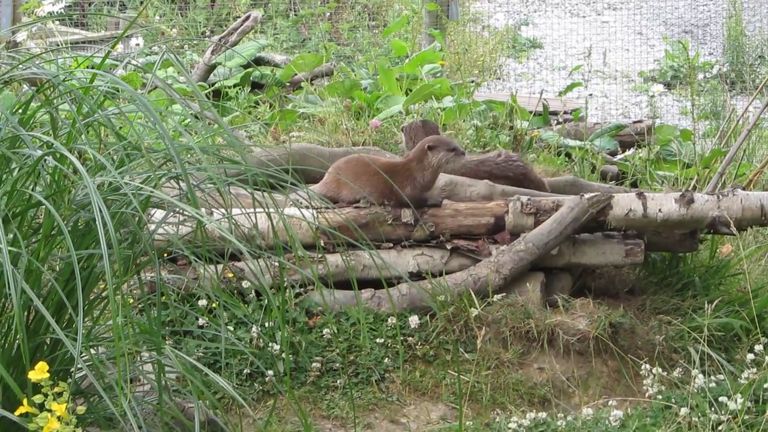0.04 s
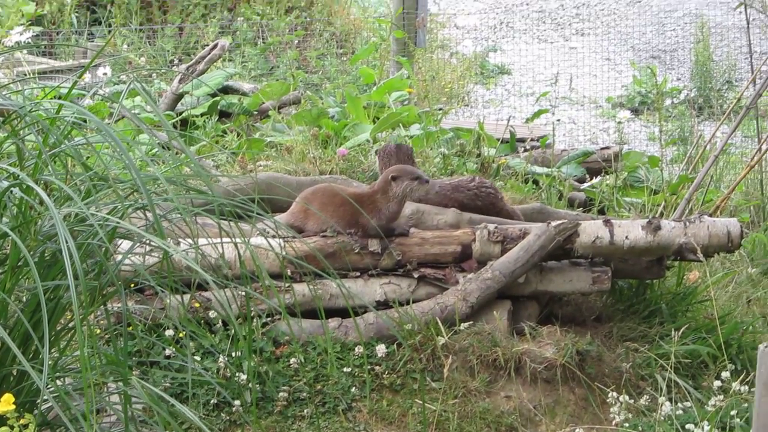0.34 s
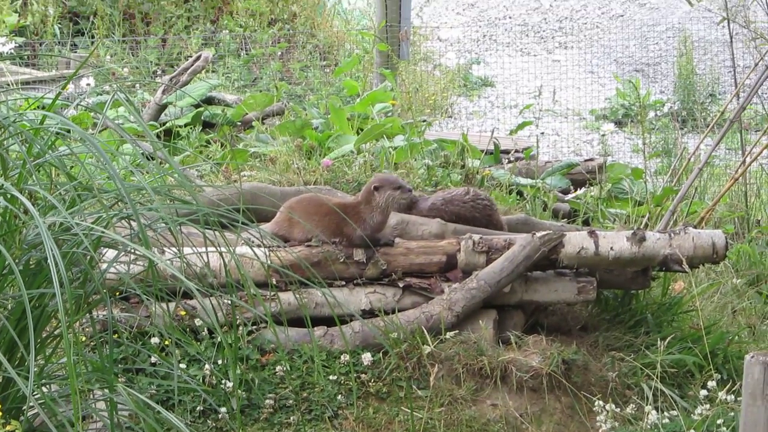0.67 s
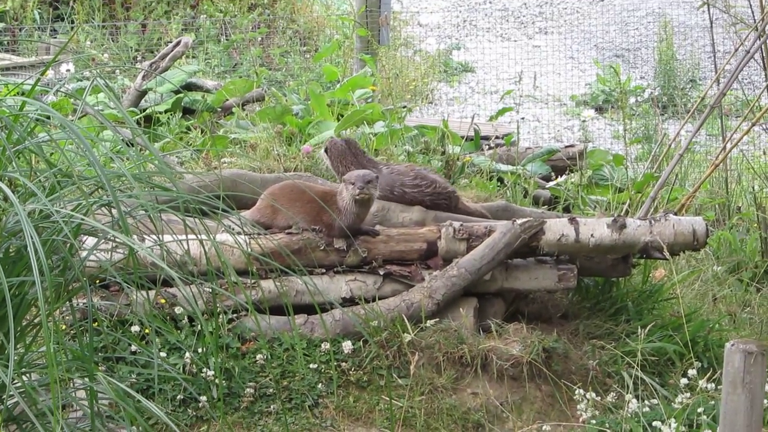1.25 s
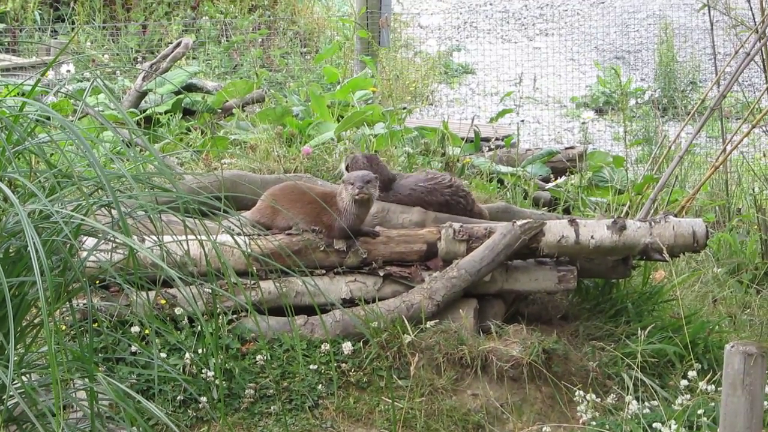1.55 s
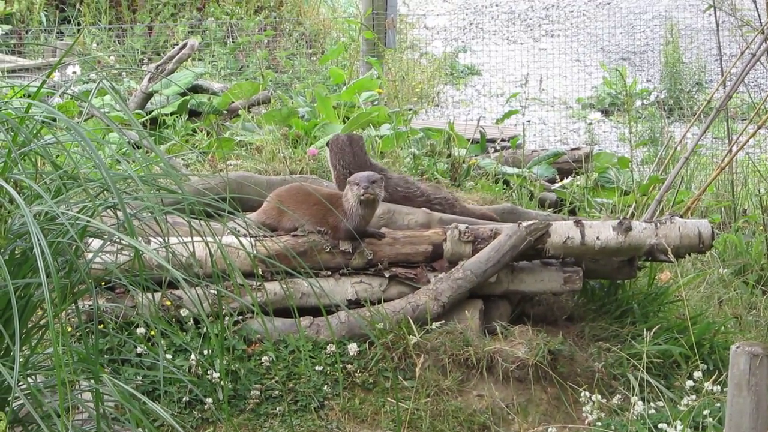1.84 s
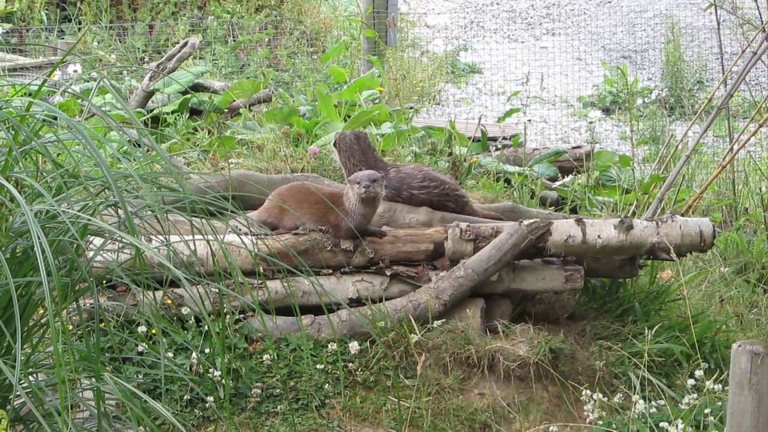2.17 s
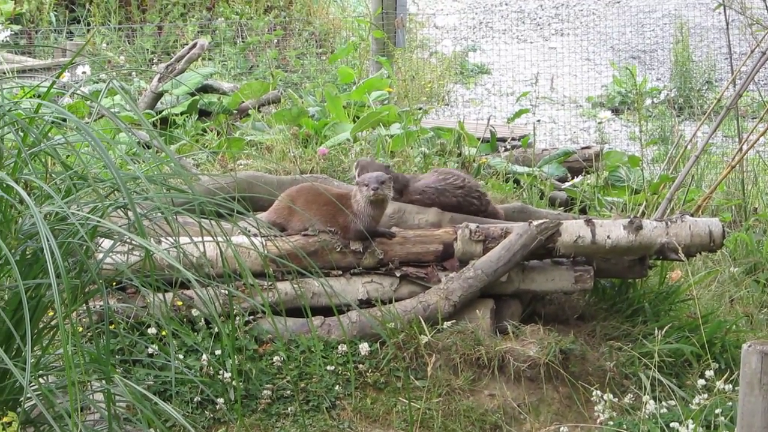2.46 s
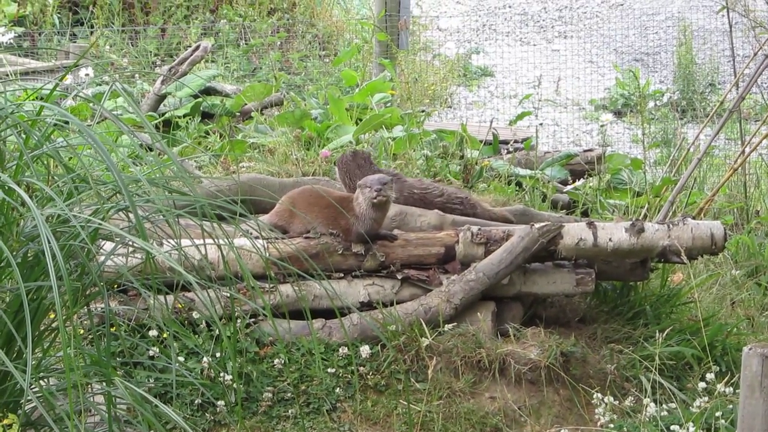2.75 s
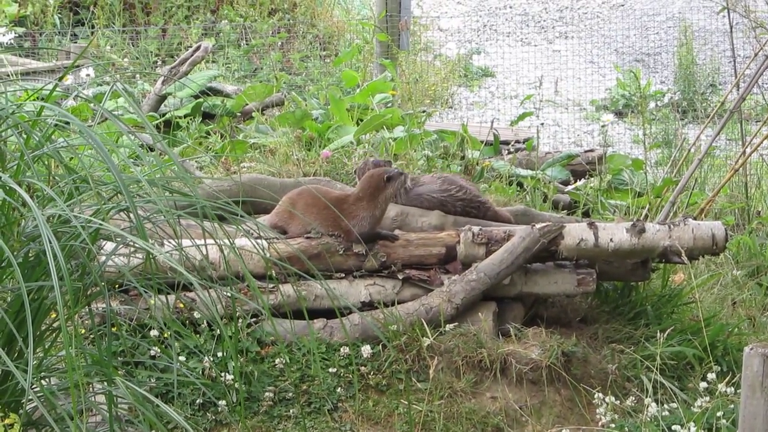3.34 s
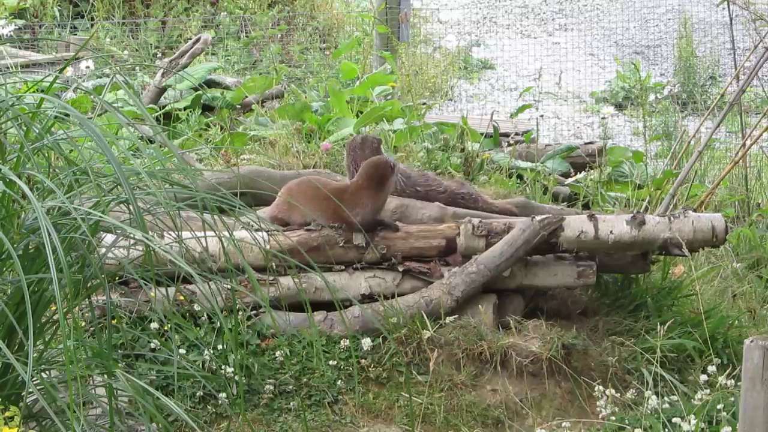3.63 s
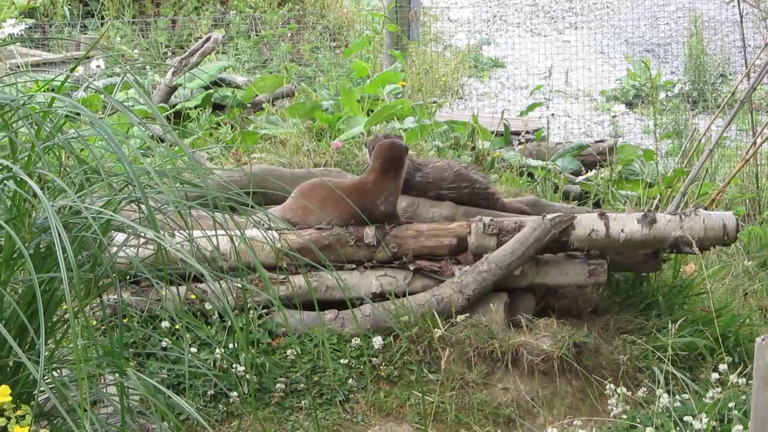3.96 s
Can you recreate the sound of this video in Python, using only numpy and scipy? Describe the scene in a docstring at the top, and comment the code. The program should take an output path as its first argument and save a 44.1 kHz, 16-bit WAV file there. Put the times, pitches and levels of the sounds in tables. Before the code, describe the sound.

An otter whines softly, then gives a sharp falling squeal that breaks into a long, level whine. Two more high squeals follow, the last one weaker. Water trickles steadily underneath in an outdoor enclosure with a slight echo.

```python
"""Water trickles and splashes under a brief, soft whine from an otter on an outdoor log pile.
The otter gives three sharp falling squeals; the first breaks into a long, level whine that opens
and closes with the mouth. The water is a noise wash with droplets and ringing bubbles.
The enclosure adds a short echo to the voice, and a gain control ducks the water after loud squeals."""
import sys
import numpy as np
from scipy import signal
from scipy.fft import rfft, irfft
from scipy.io import wavfile
from scipy.ndimage import uniform_filter1d, minimum_filter1d

SR = 44100
rng = np.random.default_rng(int(sys.argv[2]) if len(sys.argv) > 2 else 0)


def unload_audio(sound):
    """Save the sound as a 16-bit wav file, at the path given as the first command line argument."""
    columns = np.transpose(np.atleast_2d(sound))
    # keep every value between -1 and 1, then stretch to whole-number steps
    steps = np.round(np.clip(columns, -1, 1) * 32767)
    wavfile.write(sys.argv[1], SR, steps.astype(np.int16))


N = 176400
TIME = np.arange(N) / SR


def amp(db):
    """Decibels to gain."""
    return 10 ** (np.asarray(db) / 20)


def unit(x):
    """Scales to rms 1."""
    return x / np.sqrt(np.mean(x ** 2) + 1e-20)


def read(points, hz):
    """Reads a table on a log-frequency axis."""
    f, value = np.transpose(points)
    return np.interp(np.log(hz + 1), np.log(f + 1), value)


def add(mix, start_s, sound):
    """Mixes a sound in place."""
    part = mix[max(round(start_s * SR), 0):][:len(sound)]
    part += sound[:len(part)]


def colour(x, spectrum):
    """Filters by a table of Hz and dB."""
    return irfft(rfft(x) * amp(read(spectrum, np.fft.rfftfreq(len(x), 1 / SR))), len(x))


def wander(t, rate_hz):
    """Smooth random motion, rms about 1, at the times t."""
    hz = np.fft.rfftfreq(N, 1 / SR)
    motion = irfft(rfft(rng.standard_normal(N)) / (1 + (hz / rate_hz) ** 2), N)
    return np.interp(t, TIME, unit(motion))


# Each row: frequency in Hz, relative spectral density in dB.
WASH_SPECTRUM = [(15, -35), (25, -5), (110, -7.5), (220, -8), (359, -4.5), (470, -6.5), (649, -2),
                 (805, -6.5), (1140, -0.5), (1460, -5.5), (1670, -1.5), (2430, -1.5), (3010, -0.5),
                 (4390, -4.5), (5740, -5), (11300, -11.5), (13600, -15), (15600, -25)]

def wash(level_db=-34.5, patch_db=1.5, flicker_db=1.18):
    """Running water: noise in shifting patches, flickering as it lands."""
    frames, bins = N // 256 + 5, 513
    real, imag, patches = rng.standard_normal((3, frames, bins))
    patches = uniform_filter1d(patches, size=4, axis=0)
    patches = unit(uniform_filter1d(patches, size=14, axis=1))
    spectra = (real + 1j * imag) * amp(patch_db * patches)
    noise = signal.istft(spectra.T, nperseg=1024, noverlap=768)[1][:N]
    flicker = amp(flicker_db * wander(TIME, rate_hz=54))
    return amp(level_db) * unit(colour(noise, WASH_SPECTRUM) * flicker)


def impacts(per_s, spread_db=4):
    """Random impulses, a few much larger than the rest."""
    hits = (rng.random(N) < per_s / SR) * rng.choice([-1, 1], N)
    return hits * amp(spread_db * np.minimum(rng.exponential(1, N), 4))


# Each row: frequency in Hz, relative spectral density in dB.
SPRAY_SPECTRUM = [(200, -23), (1000, -4.5), (3000, 1.5), (4500, -4.5), (7000, -1), (10000, -41),
                  (15000, -23)]

def spray(level_db=-41.5):
    """Droplets land in a dense patter."""
    return amp(level_db) * unit(colour(impacts(per_s=900), SPRAY_SPECTRUM))


def bubble(hz, decay_s, chirp_per_s=0.71):
    """A bubble rings briefly, rising in pitch."""
    t = TIME[:int(10 * decay_s * SR)]
    envelope = t / decay_s * np.exp(1 - t / decay_s)
    return envelope * np.sin(2 * np.pi * hz * t * (1 + chirp_per_s * t))


def fizz(level_db=-51.5, per_s=200, sizes=20, decay_cycles=1.9):
    """Small bubbles of many sizes ring at random."""
    rings = sum(signal.oaconvolve(impacts(per_s / sizes), bubble(hz, decay_cycles / hz))[:N]
                for hz in np.geomspace(489, 4090, sizes))
    return amp(level_db) * unit(rings)


def splash(decay_s, centre_hz, width_octaves=1.45, samples=8192):
    """A burst of spray or a low slosh: band noise that swells fast and dies away."""
    octaves = np.log2((np.fft.rfftfreq(samples, 1 / SR) + 1) / centre_hz)
    band = 1 / (1 + (octaves / width_octaves) ** 2) ** 2
    noise = unit(irfft(rfft(rng.standard_normal(samples)) * band))
    age = TIME[:samples] / decay_s
    return 2 * noise * np.exp(-age) * (1 - np.exp(-4 * age))


# Each row: time in seconds, gain of the trickle in dB.
FLOW = [(0, 0.57), (1.3, -0.5), (1.9, 1.5), (3.1, -0.9), (4, 0)]
# Each row: start in seconds, level in dB, decay in seconds, centre in Hz.
SPLASHES = [(.43, -32, 0.0057, 1240), (0.484, -28.5, 0.0051, 2980), (0.589, -33, 0.0063, 3800),
            (0.624, -37, 0.019, 288), (.636, -33.5, 0.016, 1400), (2.208, -30, 0.011, 2500),
            (2.485, -29, 0.0059, 3500), (2.578, -30, 0.0079, 2780), (3.268, -31, 0.0034, 2994),
            (3.445, -29, 0.0032, 2740), (3.484, -31, 0.0064, 2720), (3.853, -31, 0.0057, 3000),
            (3.914, -31, .008, 3194), (3.948, -30.5, 0.006, 3000)]
# Each row: start in seconds, pitch in Hz, level in dB, decay in seconds.
DRIPS = [(0.612, 2980, -27, 0.00033), (1.56, 526, -36.5, 0.0017), (1.74, 350, -35.5, 0.0031),
         (2.781, 610, -33, 0.0017), (3.105, 3040, -15, 0.00023), (3.545, 645, -39, 0.006),
         (3.799, 512, -39, 0.0039)]

def water():
    """A steady trickle with larger splashes and drips, from deep plops to short ticks."""
    mix = (fizz() + wash() + spray()) * amp(np.interp(TIME, *np.transpose(FLOW)))
    for start_s, db, decay_s, centre_hz in SPLASHES:
        add(mix, start_s, amp(db) * splash(decay_s, centre_hz))
    for start_s, hz, db, decay_s in DRIPS:
        add(mix, start_s, amp(db) * np.sqrt(2) * bubble(hz, decay_s))
    return mix


# Each row: frequency in Hz, time to fall 60 dB in seconds.
ECHO_T60 = [(1000, .16), (4000, .12), (14000, .09)]
# Each row: delay in seconds, relative gain.
REFLECTIONS = [(.006, 0.047), (0.015, 0.27), (0.023, 0.22), (.034, 0.42)]

def enclosure(x, build_s=0.0078):
    """A few reflections off logs and walls, and a short scattered tail."""
    hz, t, spectra = signal.stft(rng.standard_normal(SR // 2), SR, nperseg=256)
    decay = amp(-60 * t / read(ECHO_T60, hz)[:, None])
    response = signal.istft(spectra * decay, SR, nperseg=256)[1]
    response *= np.minimum(TIME[:len(response)] / build_s, 1)
    response /= np.linalg.norm(response)
    for delay_s, gain in REFLECTIONS:
        add(response, delay_s, np.array([gain]))
    return signal.fftconvolve(x, response / np.linalg.norm(response))[:N]


def controls(curve, fade_s=0.001):
    """Sample times, an edge fade, and the smoothed columns of a call's curve."""
    times_s, *columns = np.transpose(curve)
    t = np.arange(round(times_s[0] * SR), round(times_s[-1] * SR)) / SR
    fade = np.clip(np.minimum(t - t[0], t[-1] - t) / fade_s, 0, 1)
    return t, fade, *[uniform_filter1d(np.interp(t, times_s, column), size=130) for column in columns]


def harmonics(hz, levels_db):
    """Sums the harmonics of a pitch curve, each at its own rms level."""
    phase = 2 * np.pi * np.cumsum(hz) / SR
    return np.sqrt(2) * sum(amp(db) * (k * hz < SR / 2) * np.sin(k * phase)
                            for k, db in enumerate(levels_db, 1))


# Mouth nearly shut, open and gaping. Each row: frequency in Hz, gain in dB.
THROAT_SHUT = [(930, -17.5), (1860, -14), (2800, -1), (3700, -21.5), (4650, -20), (5580, -2.5), (6500, -29),
               (15000, -67)]
THROAT_OPEN = [(940, -20.5), (1950, -17.5), (2800, 0.5), (3000, -2), (3740, -1), (4000, -5), (4600, -9.5),
               (5150, -6), (5900, -3.5), (6500, -12.5), (6950, -5.5), (7450, -23.5), (7900, -15.5),
               (8400, -15.5), (9000, -37), (10000, -23), (15000, -49)]
THROAT_GAPING = [(1050, -21), (1400, -29), (2100, -8.5), (2900, -9.5), (3750, -4.5), (4200, -6),
                 (5100, 1.5), (5800, -15), (7800, -12), (9500, -23.5), (15000, -40)]

def throat_db(hz, mouth):
    """Throat resonances, whose valleys fill in as the mouth opens."""
    shut, gaping = np.clip(1 - mouth, 0, 1), np.clip(mouth - 1, 0, 1)
    return (shut * read(THROAT_SHUT, hz) + (1 - shut - gaping) * read(THROAT_OPEN, hz)
            + gaping * read(THROAT_GAPING, hz))


# Each row: time in seconds, pitch in Hz, level in dB, mouth (0 nearly shut, 1 open, 2 gaping).
SHORT_WHINE = [(0, 914, -25, 0.84), (.035, 890, -36, 1), (.085, 814, -42, .5)]
WHINE = [(0.895, 1479, -13, 1.4), (0.92, 1288, -20, 2.1), (0.973, 1054, -26, 1.7), (1.009, 950, -39, 0.58),
         (1.045, 941, -40.5, 0.88), (1.134, 992, -23.5, 0.84), (1.22, 987.3, -24, 0.9),
         (1.326, 971.5, -29.5, 1.1), (1.365, 953, -26, 0.68), (1.47, 920, -31.5, 0.41),
         (1.515, 933, -29, 0.37), (1.658, 922.2, -28.5, 0.35), (1.786, 925, -26.5, 0.49),
         (1.83, 914, -29.5, 0.4), (1.868, 927.5, -25, 0.3), (1.886, 933.5, -27, 0.81),
         (2.045, 936, -25.5, 0.94), (2.07, 928, -27, 0.51), (2.114, 918, -29, 0.48), (2.13, 900, -33, 0.4)]
# Each row: curve, treble cut in dB per kHz.
WHINES = [(SHORT_WHINE, 7.7), (WHINE, 0)]
# The voice cracks, then catches. Each row: centre in seconds, width in seconds, jitter as a pitch share.
CRACKS = [(0.897, 0.0105, 0.07), (1.482, 0.011, 0.015)]

def whines(echo_db=-10, dull_from_hz=2850, shimmer_db=0.33, base_jitter=0.0026):
    """Nasal tones shaped by the throat; overtones in its valleys flutter most."""
    for curve, cut_db_per_khz in WHINES:
        t, fade, hz, db, mouth = controls(curve)
        db = db + shimmer_db * wander(t, rate_hz=45)
        levels_db = []
        for k in range(1, 15):
            gain_db = throat_db(k * hz, mouth)
            cut_db = cut_db_per_khz * np.maximum(k * hz - dull_from_hz, 0) / 1000
            flutter_db = 0.43 + 0.076 * np.clip(-gain_db, 0, 20)
            levels_db.append(db + gain_db - cut_db + flutter_db * wander(t, rate_hz=11))
        cracks = sum(share * np.exp(-abs(t - centre_s) / width_s) for centre_s, width_s, share in CRACKS)
        pitch_hz = hz * (1 + (base_jitter + cracks) * wander(t, rate_hz=198))
        yield t[0], fade * harmonics(pitch_hz, levels_db), echo_db


# Each row: time in seconds, pitch in Hz, fundamental in dB, octave in dB.
FIRST_SQUEAL = [(0.709, 4650, -18, -49.3), (0.716, 4904, -23, -46), (0.728, 4930, -7, -32),
                (0.739, 4896, -11, -37), (0.751, 4402, -15.5, -26), (0.763, 4040, -12.5, -16),
                (0.777, 3920, -14, -14), (0.788, 3730, -23.5, -33), (0.818, 3150, -5, -15.5),
                (0.836, 2933, -15.5, -18), (0.847, 2815, -25, -22), (0.859, 2645, -31, -13),
                (0.874, 2390, -21.5, -25), (0.881, 2110, -35, -17.5), (0.896, 1950, -36, -37)]
SECOND_SQUEAL = [(2.817, 4800, -29, -41), (2.82, 4920, -11, -32.2), (2.833, 5180, -13, -39),
                 (2.844, 4950, -6.5, -24), (2.853, 4482, -21.5, -20.5), (2.866, 3900, -14.5, -18),
                 (2.884, 3630, -46, -19.5), (2.891, 3640, -15.5, -37), (2.903, 3370, -17.5, -17),
                 (2.912, 3094, -8.5, -30), (2.921, 2886, -12, -17.5), (2.934, 2550, -32, -28),
                 (2.941, 2530, -22, -17), (2.955, 2210, -27.5, -28.5), (2.966, 1900, -48, -27)]
THIRD_SQUEAL = [(3.567, 5250, -23.5, -55.8), (3.577, 5393, -18.5, -39), (3.588, 5010, -24.7, -52),
                (3.597, 4900, -20, -35.5), (3.614, 4230, -23.5, -26.5), (3.63, 4174, -33, -34),
                (3.642, 4117, -24.5, -21), (3.67, 4080, -25.5, -33), (3.694, 3880, -20.5, -23),
                (3.73, 3396, -23.5, -34.5), (3.744, 3120, -27.5, -31), (3.754, 2760, -18, -27),
                (3.778, 2385, -35.5, -25.5), (3.788, 1920, -29, -29)]
# Each row: curve, echo in dB, jitter as a pitch share, overtone trim in dB.
# The head is turned away for the last squeal.
SQUEALS = [(FIRST_SQUEAL, -12, 0.0061, 0.39), (SECOND_SQUEAL, -11.5, 0.0049, -0.75),
           (THIRD_SQUEAL, -3, 0.0063, -0.84)]
# Colour of harmonics 3 to 6. Each row: frequency in Hz, gain in dB.
OVERTONES = [(6000, -3), (8000, -8.5), (10000, -13), (12300, -18), (13500, -17), (15500, -35)]

def squeals(step_db=-5.5, fray_below_hz=2830, fray_jitter=0.077):
    """Piercing tones that arch and fall over an octave, gaining overtones and fraying at the bottom."""
    for curve, echo_db, jitter, trim_db in SQUEALS:
        t, fade, hz, fundamental_db, octave_db = controls(curve)
        upper_db = [octave_db + trim_db + read(OVERTONES, k * hz) + step_db * (k - 3)
                    for k in range(3, 7)]
        fray = fray_jitter * np.maximum(1 - hz / fray_below_hz, 0)
        pitch_hz = hz * (1 + (jitter + fray) * wander(t, rate_hz=350))
        yield t[0], fade * harmonics(pitch_hz, [fundamental_db, octave_db, *upper_db]), echo_db


def scene():
    """The otter and its echo over the water, the same in both ears."""
    direct, echo_send = np.zeros((2, N))
    for start_s, call, echo_db in [*squeals(), *whines()]:
        add(direct, start_s, call)
        add(echo_send, start_s, amp(echo_db) * call)
    return np.tile(direct + enclosure(echo_send) + water(), (2, 1))


def record(dry):
    """Gain control clamps loud squeals at once, holds, and recovers slowly; a low-pass follows."""
    limit_db, hold_s, recover_db_per_s, cutoff_hz = -13, 0.049, 16.5, 15700
    power_db = 10 * np.log10(abs(uniform_filter1d(dry[0] ** 2, size=90)) + 1e-12)
    over_db = np.maximum(power_db - limit_db, 0)
    half_hold = int(hold_s * SR / 2)
    held_db = -minimum_filter1d(-over_db, 2 * half_hold + 1, origin=half_hold, mode="nearest")
    recovery_db = recover_db_per_s * TIME
    duck_db = np.maximum.accumulate(held_db + recovery_db) - recovery_db
    lowpass = signal.firwin(511, cutoff_hz, window=("kaiser", 9), fs=SR)
    return signal.oaconvolve(dry * amp(-duck_db), lowpass[None], "same")


dry = scene()
out = record(dry)
unload_audio(out)
```